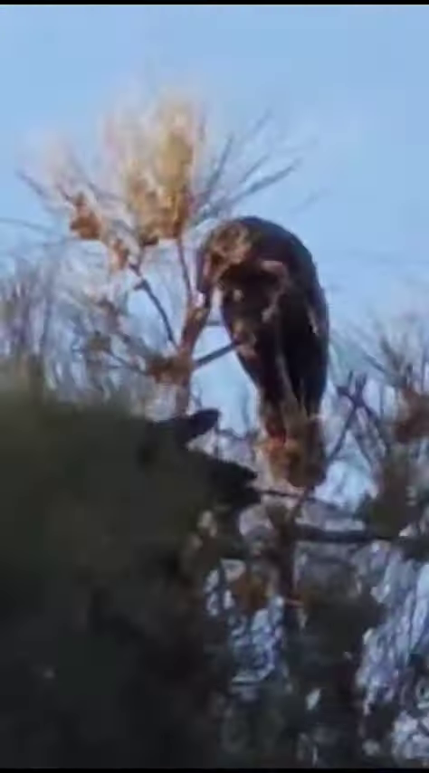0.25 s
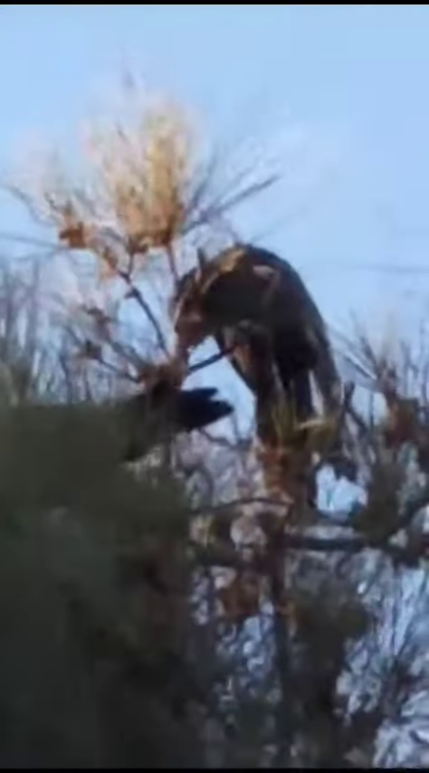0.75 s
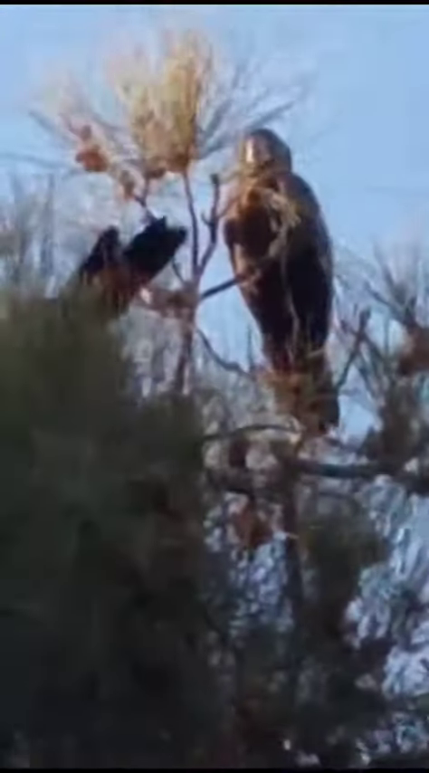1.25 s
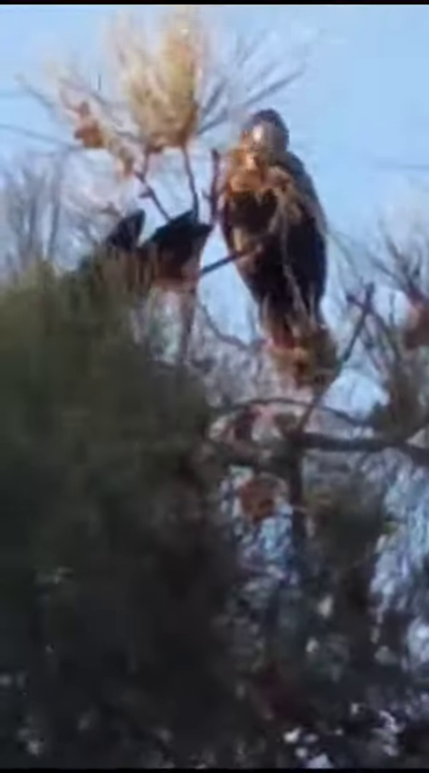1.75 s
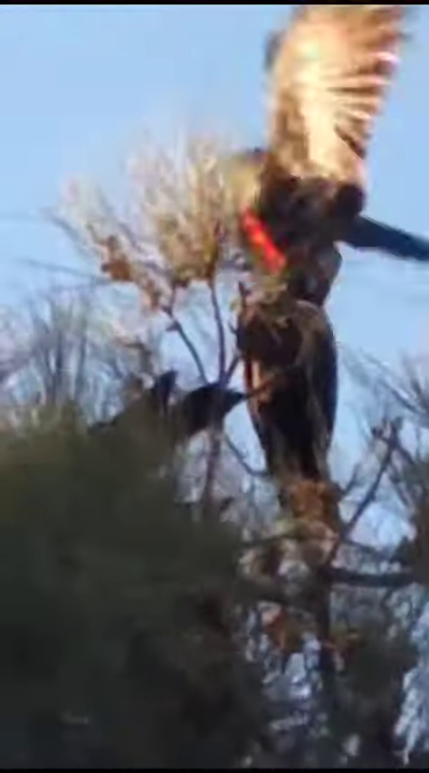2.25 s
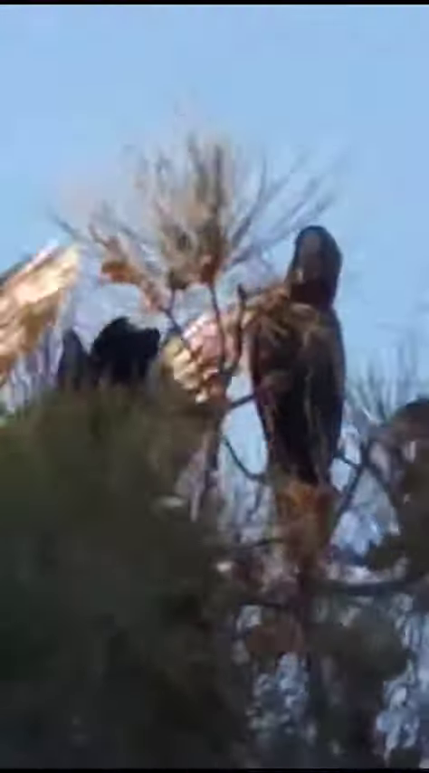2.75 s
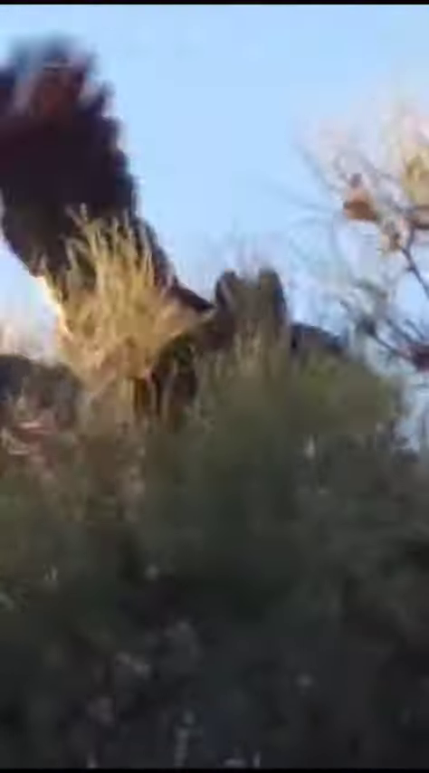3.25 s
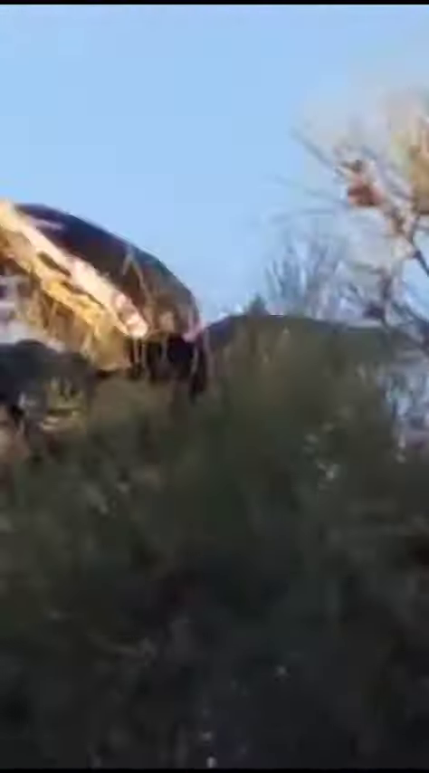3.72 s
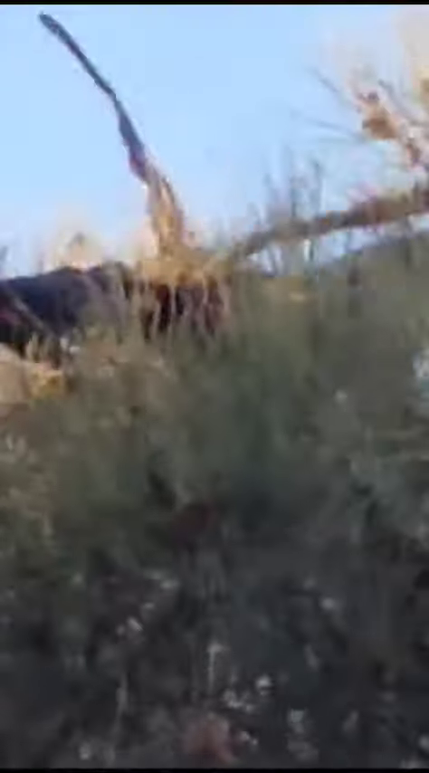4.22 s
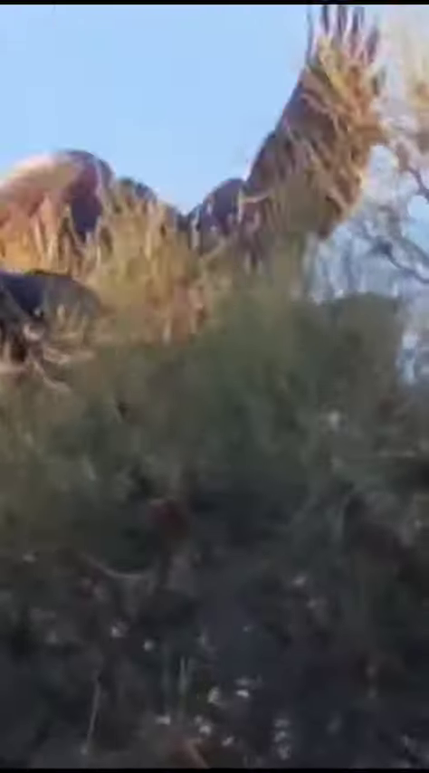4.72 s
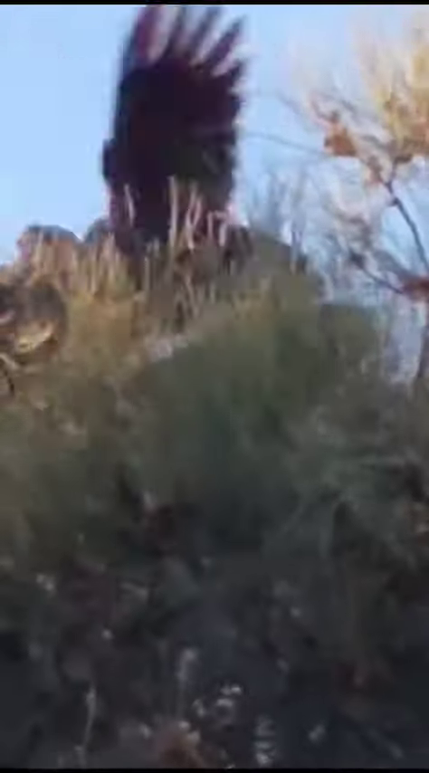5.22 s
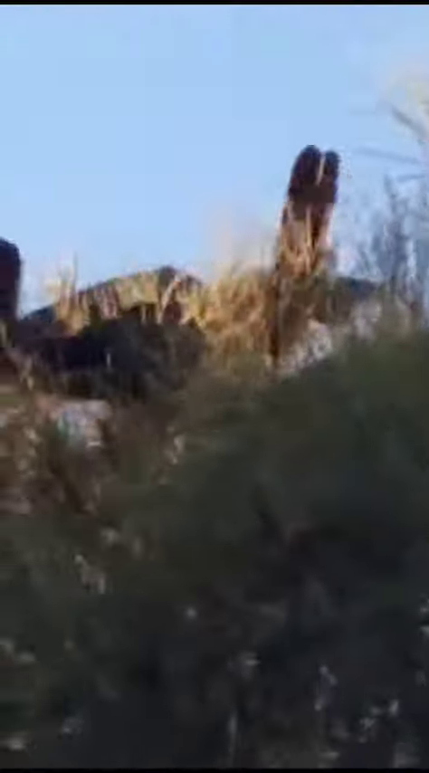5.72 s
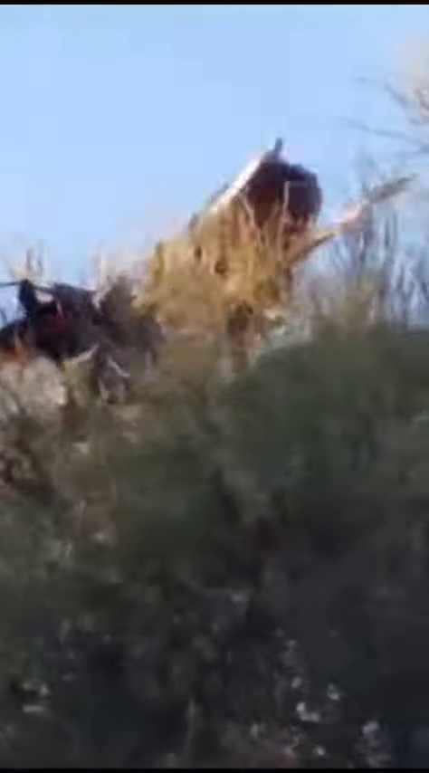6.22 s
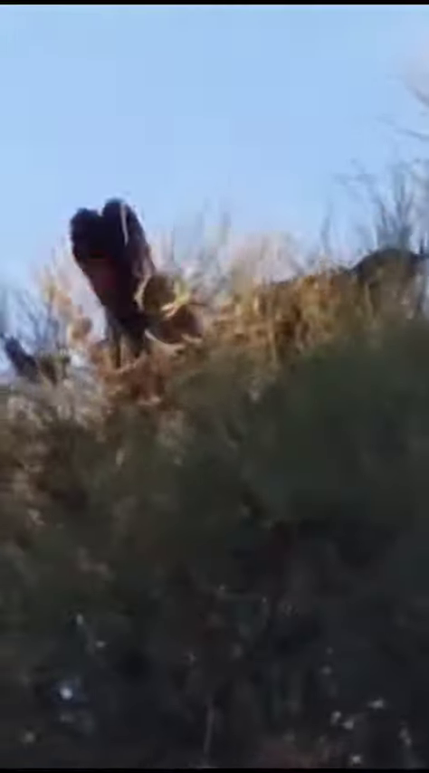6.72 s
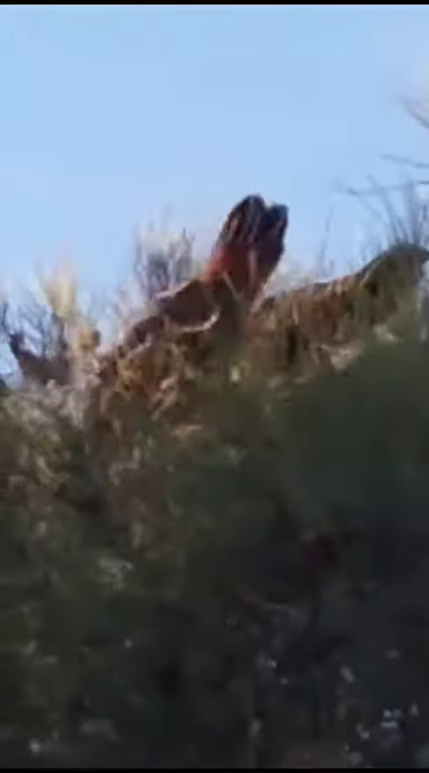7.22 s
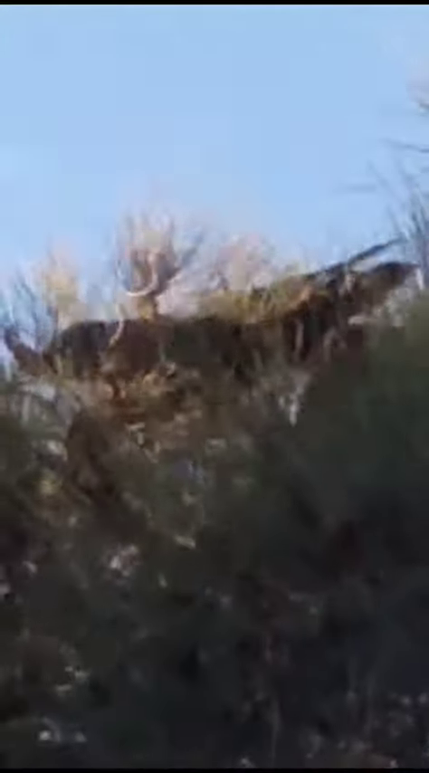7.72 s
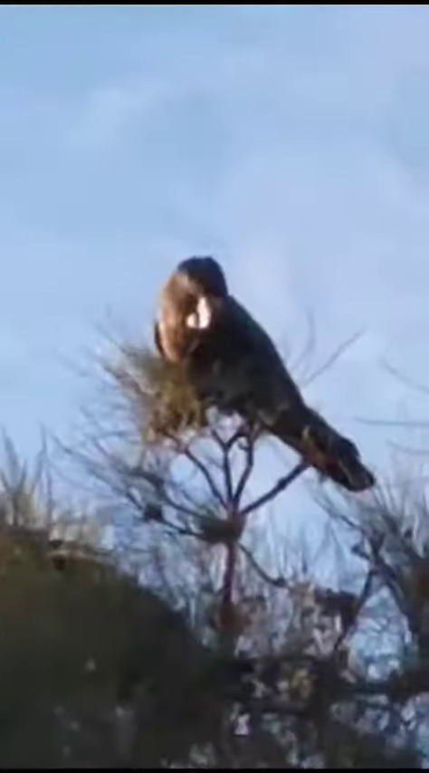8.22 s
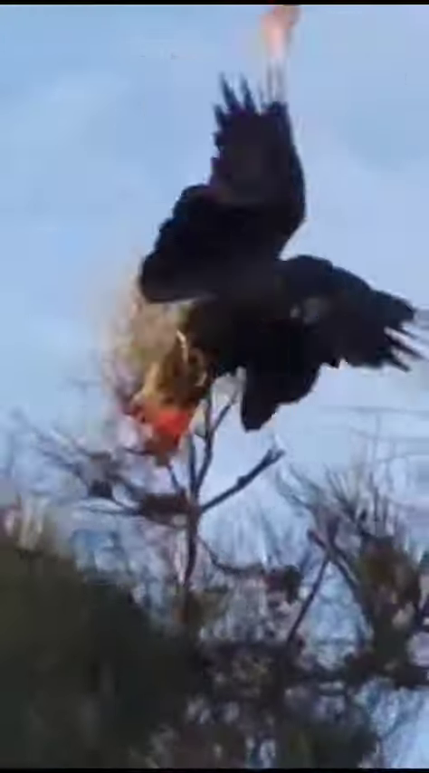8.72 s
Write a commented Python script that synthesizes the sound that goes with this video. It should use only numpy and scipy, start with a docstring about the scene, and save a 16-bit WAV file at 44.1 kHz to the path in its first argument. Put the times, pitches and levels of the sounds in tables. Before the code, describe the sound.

Overlapping raspy and clear cockatoo squawks fill the trees over low wind rumble, stopping dead near the end, leaving faint small bird chirps.

```python
"""Black cockatoos squabble in the treetops from the start: arched screeches near 1 kHz, some clear, some rasping.
Each is a stack of harmonics shaped by throat and beak; the trees scatter a short tail, over wind and low rumble.
Faint hums soon join as gliding sines, then one bird's falling whistle with its octave.
At 8.39 s the chorus, its tail and part of the leaf noise stop dead.
The scene cuts to a quieter spot, where a small songbird chirps, as short gliding sines; both ears hear the same."""
import sys
import numpy as np
from scipy import signal
from scipy.fft import rfft, irfft, next_fast_len
from scipy.io import wavfile
from scipy.ndimage import map_coordinates

SR = 44100
rng = np.random.default_rng(int(sys.argv[2]) if len(sys.argv) > 2 else 0)


def master_out(mix):
    """Clip the mix to full scale and print it as 16-bit PCM to the path in sys.argv[1]."""
    frames = np.transpose(np.atleast_2d(mix))
    ceiling = np.clip(frames, -1, 1)
    pcm = np.round(ceiling * 32767).astype(np.int16)
    wavfile.write(sys.argv[1], SR, pcm)


N = 395577

# screeches, one a row: (start [s], length [s], time to the top [s], top pitch [Hz], scoop up [semitones],
# sag after the top [semitones], level before the flock's gain [dB], fade by the end [dB],
# open-beak resonance [Hz], roughness [0-1], brightness [dB])
SCREECHES = [(0.0, 0.24, 0.01, 883, -4.5, 4.5, -35.1, 35, 2130, 0.02, 0),
             (0.074, 0.2, 0.035, 1057, 2.5, 5.5, -28.5, 29, 2280, 0, 6),
             (0.337, 0.31, 0.11, 1080.0, 3, 4, -36.5, 29, 1160.0, 0.12, 9.5),
             (0.381, 0.072, 0.072, 1020, 1.6, -1, -28, 22, 1780, 0, 0),
             (0.422, 0.23, 0.033, 954, 4, 3, -32, 6.5, 3380, 0.15, 7.5),
             (0.59, 0.344, 0.21, 1154.0, 2.1, 2.33, -38.5, -2.5, 2290.0, 0.28, -1.7),
             (0.628, 0.184, 0.087, 882, 1.2, 1.5, -35.5, 10.0, 2130, 0.53, 1),
             (0.985, 0.24, 0.12, 1055.0, 2.5, 2.5, -33, 7, 4820, 0, 6),
             (1.104, 0.3, 0.093, 942, 1.6, 0.7, -33, 20.5, 2560, 0.32, 5),
             (1.126, 0.3, 0.059, 880.6, 3.8, 0.36, -38, -2, 2340, 0.15, 7.5),
             (1.128, 0.19, 0.095, 947, 0.8, 1.2, -39, 4, 3800, 0.03, 10.5),
             (1.24, 0.14, 0.046, 920, 5.3, 2, -30.5, 6, 3350, 0.13, -3.5),
             (1.458, 0.288, 0.035, 941, 0.7, 5.5, -39.5, 11.5, 2320, 0.22, 3),
             (1.705, 0.46, 0.063, 979, 1.7, 4, -32.5, 17, 2770, 0.36, 5),
             (1.721, 0.27, 0.079, 1037.0, 1.5, 1.5, -28, 13.5, 4700, 0.05, 5.5),
             (1.861, 0.17, 0.1, 929, 0.9, 0.3, -35, 4, 3100, 0.01, 9.8),
             (1.968, 0.27, 0.062, 994, -1, 1.3, -34.5, 20, 2500, 0.29, 4.5),
             (2.01, 0.12, 0.048, 910, 0.0, 2, -40, -8, 3260, 0.12, 5.5),
             (2.114, 0.19, 0.045, 938, 1.1, 3, -36.5, 4.5, 3760, 0.16, 1.5),
             (2.308, 0.38, 0.089, 962, 2.5, 0.6, -40, 14.0, 2530, 0.47, 2.0),
             (2.352, 0.23, 0.12, 1045, 3.5, 1.0, -33, 40, 4630, 0.11, 6),
             (2.416, 0.21, 0.049, 1047, 0.9, 2.1, -35.5, 9, 3420, 0.02, 7.9),
             (2.572, 0.15, 0.05, 1210, -1.5, 1.5, -37, 17, 2400.0, 0, -5.9),
             (2.611, 0.089, 0.019, 1003, 1.0, 0.4, -33.0, 12.5, 1790, 0.03, -1),
             (2.686, 0.2, 0.15, 934, 3.1, 3, -35, 30, 2120, 0.18, -2.5),
             (2.906, 0.31, 0.098, 1036, 1, 4.5, -28, 22.5, 1500, 0.26, 0),
             (2.922, 0.24, 0.075, 933, 6, 3, -37, 10, 3900, 0.12, -0.5),
             (3.083, 0.082, 0.004, 1100, 4, 2.5, -26, 25, 1820, 0.04, 0.5),
             (3.216, 0.215, 0.1, 1000.0, 0.0, 1.1, -34.5, 12, 2490, 0.55, 0),
             (3.262, 0.28, 0.128, 1098, 0.6, 1, -32.5, -1, 1240, 0.28, -8),
             (3.509, 0.39, 0.025, 957, 1.0, 5, -31, 10, 6330, 0.41, -16.5),
             (3.529, 0.11, 0.09, 1143, 6, 0.1, -29, 36, 2730, 0.46, 5),
             (3.614, 0.23, 0.12, 1082, 1.2, 0.8, -32.5, 6.5, 3780, 0, 8.5),
             (3.646, 0.18, 0.069, 867, 0.9, 2, -37, 21, 3760, 0.03, -6.5),
             (3.831, 0.098, 0.029, 1128, 2.5, 3.0, -29, 12, 2650.0, 0.45, 2.5),
             (3.913, 0.15, 0.045, 1070, 2.5, 0.0, -29.5, 3.5, 1310, 0.46, -4),
             (4.001, 0.23, 0.17, 1172, 1.8, 1.4, -25.5, -5, 1600, 0.26, -14),
             (4.048, 0.229, 0.13, 947, 1, 2.1, -35.5, -4, 2430, 0.66, 1),
             (4.239, 0.21, 0.14, 1050.0, 0.6, 1.2, -31.5, 21, 3570, 0, 7),
             (4.345, 0.3, 0.053, 919, 0.5, 3, -38.5, 0.5, 2280, 0.3, 4.5),
             (4.441, 0.078, 0.0033, 1137, -0.5, 2, -20, 18, 1580.0, 0.4, -12.5),
             (4.535, 0.37, 0.15, 1153, 4, 2.5, -25, 12, 1370, 0.18, -8.5),
             (4.565, 0.296, 0.12, 929, 1.4, 1.3, -35, 9.5, 2370.0, 0.6, -1),
             (4.825, 0.29, 0.13, 1103, 0.84, 2, -28, 22.5, 3730, 0, 1),
             (5.057, 0.11, 0.034, 1131, 4, 2, -27.5, 16.5, 1840.0, 0.37, -1.8),
             (5.073, 0.37, 0.064, 935, -0.6, 3, -38.5, 3, 2380, 0.45, -2),
             (5.111, 0.17, 0.09, 902, 1.2, 1.1, -38.5, -10, 3640, 0.2, 2.5),
             (5.161, 0.058, 0.057, 1067, 2.5, -4, -25.5, 17, 1820, 0, -0.5),
             (5.207, 0.3, 0.098, 1047, 1.3, 2, -31.5, 8.5, 1770, 0.11, -1.5),
             (5.489, 0.051, 0.057, 1137.0, 4, 1.5, -28, 7, 2840, 0.17, 1.5),
             (5.518, 0.2, 0.12, 1086, 0.6, 1.1, -31.5, 2, 3460, 0.08, 6.5),
             (5.609, 0.29, 0.0706, 971.4, 2, 1.4, -38, 1, 2560, 0.34, 5.5),
             (5.693, 0.15, 0.045, 1156, 1.5, 3, -32, 5, 2760, 0.55, -4),
             (5.842, 0.29, 0.016, 939, 0, 3.5, -34.5, 5.5, 3230, 0.27, -0.5),
             (5.866, 0.34, 0.13, 994.4, 2.5, 2.0, -34, 7.5, 4840, 0, -6.5),
             (6.124, 0.229, 0.12, 944, 2.0, 1.6, -36.5, 0, 4000.0, 0, -4.5),
             (6.152, 0.26, 0.14, 1101, 1.5, 1.0, -29, 29, 2710.0, 0.23, 2),
             (6.284, 0.32, 0.064, 977, 0.9, 1.45, -32.5, 9.5, 2630, 0.32, 0.5),
             (6.291, 0.21, 0.013, 1183, 0.8, 2.8, -32.5, 5, 1970, 0.4, -0.5),
             (6.334, 0.19, 0.037, 936, 0.0, 2.5, -38.5, 16.0, 3460, 0.11, 7),
             (6.6, 0.217, 0.039, 885, 0.5, 1.5, -38, 3, 3230, 0.03, -1.5),
             (6.694, 0.17, 0.12, 1070, 3.5, 1.4, -31, 27, 2310.0, 0.1, -2.2),
             (6.713, 0.2, 0.13, 919.0, 2, 2.5, -32.0, 3.5, 1550, 0.06, -14),
             (6.816, 0.17, 0.045, 1020, 1, 0.7, -37, 16, 3320, 0.09, 4),
             (6.879, 0.23, 0.12, 1037, 2.5, 0, -35, 7, 2300.0, 0, -6),
             (6.912, 0.33, 0.078, 875, 1.5, 2.5, -37, 16.5, 3300, 0.08, 7),
             (6.914, 0.288, 0.106, 984.5, 2.1, 2.06, -29.5, 9.5, 2520, 0.14, -3),
             (6.943, 0.13, 0.023, 952, 0.1, 1, -40, 3, 3240.0, 0.1, 1.5),
             (7.418, 0.22, 0.079, 911, 3, 2, -37.5, 6, 3330, 0.11, -1.5),
             (7.562, 0.2, 0.09, 966, 1.7, 0.4, -30.5, 10.5, 2710, 0.24, 1.5),
             (7.618, 0.22, 0.049, 940, 0.4, 1.3, -34.5, 16, 3230, 0.1, -0.5),
             (7.709, 0.25, 0.12, 930, 4, 2, -36.5, 5, 1360, 0.2, -7.5),
             (7.754, 0.3, 0.13, 1004, 2.5, 2.5, -35.5, 13.5, 1790.0, 0.02, 4),
             (8.129, 0.237, 0.12, 960.0, 1.8, 1.0, -30.5, 10.5, 2300, 0.28, 1.2),
             (8.289, 0.11, 0.095, 998, 0.4, 2, -32.5, 16.0, 2400, 0.11, -1.5)]
# resonance of the cockatoo's throat: (frequency [Hz], relative gain [dB])
THROAT_GAIN = [(800, -16), (1100, -14.5), (1400, -13.5), (1900, 0), (2400, -11), (3000, -2.5), (4000, -3),
               (5200, -10), (6300, -19.5), (7500, -17), (9000, -26.5), (11500, -22.5), (13500, -18.5),
               (15500, -23)]
# reverberation time among the trees: (frequency [Hz], time to decay by 60 dB [s])
TREE_DECAY = [(500, 0.097), (3000, 0.61), (12000, 0.067)]
# low outdoor rumble, before its gusts: (time [s], level [dB])
RUMBLE_COURSE = [(0, -50.5), (1.5, -49.5), (2.5, -48.5), (3.6, -48.5), (5.6, -48), (6.8, -53), (7.8, -51.5),
                 (8.97, -58)]
# relative spectra of the rumble and of the leaf noise: (frequency [Hz], density [dB per Hz])
RUMBLE_SPECTRUM = [(13, -34), (22, 0), (59, 3.5), (146, -4.5), (241, -10.5), (318, -12), (600, -17),
                   (780, -17), (1320, -120)]
LEAF_SPECTRUM = [(200, -30), (500, -3.5), (1000, 7.5), (1850, 6), (2300, -3), (3500, -12.5), (5000, -27.5),
                 (15000, -26)]
# gliding tones, before fades: (start [s], length [s], first pitch [Hz], last pitch [Hz], level [dB])
# a falling hum far off, and fainter rising ones
FALLING_HUM = [(.35, .7, 137, 66.1, -48.5)]
RISING_HUMS = [(1.5, 1.8, 217, 261, -64.5), (3.4, 1.4, 172, 184, -61), (3.4, 1.3, 231.7, 247.2, -63),
               (4.8, 1.4, 430, 452, -66.5)]
# one cockatoo's falling note and its octave, same columns
FALLING_WHISTLE = [(.72, .21, 1167, 1092, -33), (.76, 0.2, 2340, 2090, -40)]
# the songbird's notes, same columns
SONGBIRD_NOTES = [(8.443, .012, 7900, 5700, -61.5), (8.454, 0.022, 5900, 6400, -59),
                  (8.66, 0.026, 3380, 2510, -60), (8.68, .1, 5820, 4900, -84),
                  (8.775, 0.043, 2950, 5100, -53), (8.945, 0.033, 2850, 3500, -55)]

CHORUS_END_S, TOP_HZ = 8.39, 15550
SCOOP_BEND, SAG_BEND = 2.25, 1.67  # exponents: a quick scoop that flattens, then an ever steeper sag
ATTACK_S, ATTACK_DB, EDGE_S = 0.026, 10, .02  # a call swells from this far down; its start is rounded off
BEAK_SHUT_HZ, BEAK_OPENS_S, BEAK_CLOSE_BEND = 1570, 0.014, 5.1  # the beak opens quickly and closes late
BEAK_TRAVEL = 0.88  # share of the way to shut that it covers at the ends of a call
TREMBLE_DB, TREMBLE_RATE = 1.38, 55  # unsteady effort within a call (dB, random knots per s)
SWELL_DB_PER_SEMITONE = 1.15  # the voice grows louder as it scoops up
END_ROUGH = 0.15  # roughness gained as the call runs out
TREBLE_UNEVEN_DB, TREBLE_FROM_HZ = 3, 6000  # each call favours some high harmonics over others
FRAY = .0052  # scale of every voice's fast jitter, as a share of its pitch
RELEASE_S, DROOP_SEMITONES = 0.062, 1.2  # the voice lets go: it droops and dies away
TAIL_DB = -11  # energy of the flock's scattered tail, against the direct path


def amp(db):
    """Logarithmic level: decibels to amplitude gain."""
    return 10 ** (np.asarray(db) / 20)


def unit(x):
    """Normalization by power: scale to rms 1."""
    return x / np.sqrt(np.mean(x ** 2) + 1e-20)


def along(points, hz):
    """Logarithmic frequency scale: interpolate (frequency [Hz], value) points."""
    f, value = np.transpose(points)
    return np.interp(np.log(hz + 1), np.log(f + 1), value)


def wobble(n, rate):
    """Band-limited fluctuation: a smooth random curve of n samples, with rate knots a second."""
    knots = rng.standard_normal(int(n * rate / SR) + 4)
    return map_coordinates(knots, [np.arange(n) * rate / SR], order=2)


def filtered(x, response):
    """Linear filtering: multiply the spectrum of x by a response of frequency."""
    m = next_fast_len(N + SR // 2)
    return irfft(rfft(x, m) * response(np.fft.rfftfreq(m, 1 / SR)), m)[:N]


def noise(spectrum):
    """Spectral shaping: white noise coloured by a filter, at rms 1."""
    return unit(filtered(rng.standard_normal(N), lambda hz: amp(along(spectrum, hz))))


def add(track, start, sound):
    """Superposition: mix a sound into a track from its start in seconds."""
    part = track[round(start * SR):][:len(sound)]
    part += sound[:len(part)]


def gate(t, length, edge):
    """Amplitude envelope: a window with squared-sine edges that avoid clicks."""
    return np.sin(np.pi / 2 * np.clip(np.minimum(t, length - t) / edge, 0, 1)) ** 2


def arch(t, length, rise, scoop, sag):
    """Pitch contour: semitones relative to the top of a call, and how far its fall has gone (0-1)."""
    rise = np.clip(rise, length / 20, length * 19 / 20)
    climb = np.clip(1 - t / rise, 0, 1)
    fall = np.clip((t - rise) / (length - rise), 0, 1)
    semitones = -max(scoop, 0) * climb ** SCOOP_BEND - sag * fall ** SAG_BEND
    return semitones, fall


def screech(length, rise, top_hz, scoop, sag, peak_db, fade_db, open_hz, rough, bright_db,
            beak_db=10.5, beak_octaves=0.21,  # height and width of the beak resonance
            push_db=15,  # brightness gained per octave of pitch
            edge_rough=0.51, settle=0.031,  # extra roughness at the onset, and its decay in seconds
            waver=0.0031, rasp_hz=160, smear=0.61, count=17):
    """Source and filter: the syrinx buzzes along an arched pitch, throat and beak shape it, flutter makes it rasp."""
    t = np.arange(-EDGE_S / 2, length + RELEASE_S / 2, 1 / SR)
    n, age = len(t), np.maximum(t, 0)

    # pitch, level and beak all follow one arch
    semitones, fall = arch(age, length, rise, scoop, sag)
    letting_go = np.clip((t - length) / RELEASE_S + .5, 0, 1)
    semitones = semitones - DROOP_SEMITONES * letting_go ** 2
    pitch = top_hz * 2 ** (semitones / 12)
    level_db = peak_db - ATTACK_DB * np.exp(-age / ATTACK_S) - fade_db * fall ** 2
    level_db += TREMBLE_DB * wobble(n, TREMBLE_RATE)
    level_db += SWELL_DB_PER_SEMITONE * semitones * (age < rise)
    shut = BEAK_TRAVEL * np.maximum(np.exp(-age / BEAK_OPENS_S), fall ** BEAK_CLOSE_BEND)
    beak_hz = open_hz * (BEAK_SHUT_HZ / open_hz) ** shut

    # the voice breaks in harshly before it settles, and frays at the end
    rough = rough + edge_rough * np.exp(-age / settle) + END_ROUGH * fall ** 2
    flutter_hz = rasp_hz * (1 + 0.2155 * wobble(n, 70))
    flutter = np.sin(2 * np.pi * np.cumsum(flutter_hz) / SR)

    # uneven cycles blur the high harmonics most, fraying the top ones into hiss
    unsteady = waver * wobble(n, 70) + rough * (.028 * wobble(n, 600) + flutter / 50)
    unsteady += FRAY * wobble(n, 2600)
    phase = 2 * np.pi * np.cumsum(pitch * (1 + unsteady)) / SR

    # the bird pushes hardest, and sounds brightest, at the top of the arch
    tilt_db = bright_db + push_db * np.log2(pitch / top_hz)
    voice, colour = np.zeros(n), rng.standard_normal(count)
    for k in range(1, count + 1):
        hz = k * pitch
        beak = beak_db * np.exp(-.5 * (np.log2(hz / beak_hz) / beak_octaves) ** 2)
        # the tilt sets in at 3 kHz and is complete an octave above
        gain_db = along(THROAT_GAIN, hz) + beak + tilt_db * np.clip(np.log2(hz / 3000), 0, 1)
        if k * top_hz > TREBLE_FROM_HZ:
            gain_db += TREBLE_UNEVEN_DB * (colour[k - 1] - .5)
        # foliage in the path makes each harmonic swell and fade on its own, the high ones most
        knots = np.arange(0, n, SR // 45)
        fading = np.interp(np.arange(n), knots, rng.standard_normal(len(knots)))
        fading_db = min(.7 + .4 * k, 3.8) * fading
        voice += amp(gain_db + fading_db) * np.sin(k * phase + rng.uniform(0, 2 * np.pi))

    # turbulent air roughens the tone and spreads a hiss between the harmonics
    grit = 1 + rough * (flutter / 2 + smear * wobble(n, 400))
    grit += (0.0069 + 0.29 * rough) * wobble(n, 1800)
    ends = gate(t - t[0], np.inf, EDGE_S) * np.cos(np.pi / 2 * letting_go) ** 2
    return np.sqrt(2) * amp(level_db) * ends * voice * unit(grit)


def cockatoos(flock_db=-0.26):
    """Superposition of sources: all the screeches of the flock together."""
    flock = np.zeros(N)
    for start, *call in SCREECHES:
        add(flock, max(start - EDGE_S / 2, 0), screech(*call))
    return amp(flock_db) * flock


def trees(x):
    """Multiple scattering: trunks and crowns return a short decaying tail, whose high treble dies first."""
    hz, t, z = signal.stft(rng.standard_normal(SR // 2), SR, nperseg=256)
    decay_db = -60 * t / along(TREE_DECAY, hz)[:, None]
    tail = signal.istft(z * amp(decay_db), SR, nperseg=256)[1]
    return signal.fftconvolve(x, tail / np.linalg.norm(tail))[:N]


def air(leaves_db=-54, gust_db=1.0):
    """Broadband turbulence: a gusting low outdoor rumble and a steady breeze in the leaves."""
    level_db = np.interp(np.arange(N) / SR, *np.transpose(RUMBLE_COURSE))
    rumble = amp(level_db + gust_db * wobble(N, 9.1)) * noise(RUMBLE_SPECTRUM)
    return rumble + amp(leaves_db) * noise(LEAF_SPECTRUM)


def glides(notes, bend, edge, fade_db):
    """Frequency modulation: sines slide and fade; a bend over 1 slides late, under 1 early."""
    track = np.zeros(N)
    for start, length, first_hz, last_hz, level_db in notes:
        t = np.arange(0, length, 1 / SR)
        pitch = first_hz * (last_hz / first_hz) ** ((t / length) ** bend)
        level = amp(level_db - fade_db * (t / length) ** 2) * gate(t, length, edge)
        phase = 2 * np.pi * np.cumsum(pitch) / SR
        add(track, start, np.sqrt(2) * level * np.sin(phase))
    return track


def hums(drift_db=3):
    """Amplitude modulation: faint low tones from far away come and go."""
    low = glides(FALLING_HUM, bend=.55, edge=0.037, fade_db=0)
    low += glides(RISING_HUMS, bend=0.98, edge=0.091, fade_db=-4.5)  # a negative fade grows
    return low * amp(drift_db * wobble(N, 12))


def whistle():
    """Harmonic relation: one cockatoo's falling note sounds with its octave."""
    return glides(FALLING_WHISTLE, bend=1.3, edge=.015, fade_db=15)


def songbird_chirps():
    """Rapid frequency sweep: each short note bends late in its course and fades."""
    return glides(SONGBIRD_NOTES, bend=2.1, edge=.005, fade_db=9)


def scene():
    """Superposition: the flock in its trees, then the songbird at a quieter spot; the same in both ears."""
    flock = cockatoos() + whistle()
    chorus = flock + amp(TAIL_DB) * trees(flock) + amp(-51.0) * noise(LEAF_SPECTRUM)
    # the chorus and its leaf noise cut off within a few milliseconds
    lasting = np.clip((CHORUS_END_S - np.arange(N) / SR) / 0.00343, 0, 1)
    songbird = songbird_chirps()
    mono = chorus * lasting + air() + hums() + songbird + amp(-10) * trees(songbird)
    return np.array([mono, mono])


def record(dry):
    """Band limitation: nothing is kept from TOP_HZ up."""
    return np.array([filtered(channel, lambda hz: hz < TOP_HZ) for channel in dry])


dry = scene()
out = record(dry)
master_out(out)
```